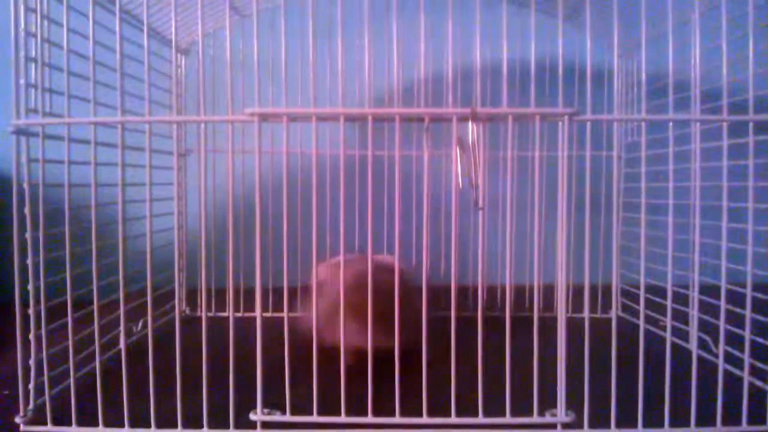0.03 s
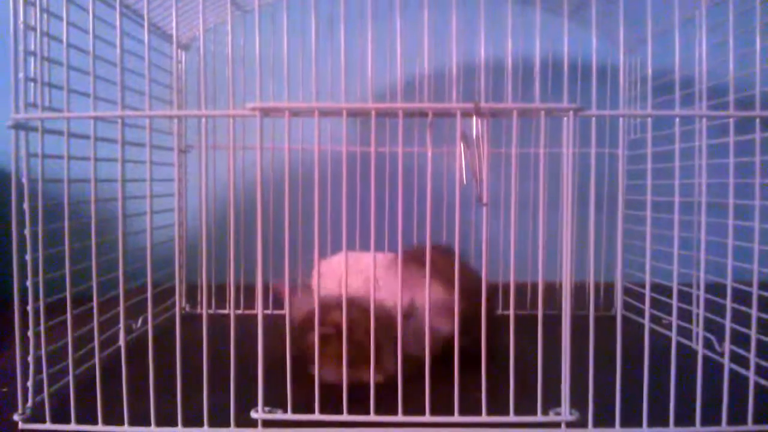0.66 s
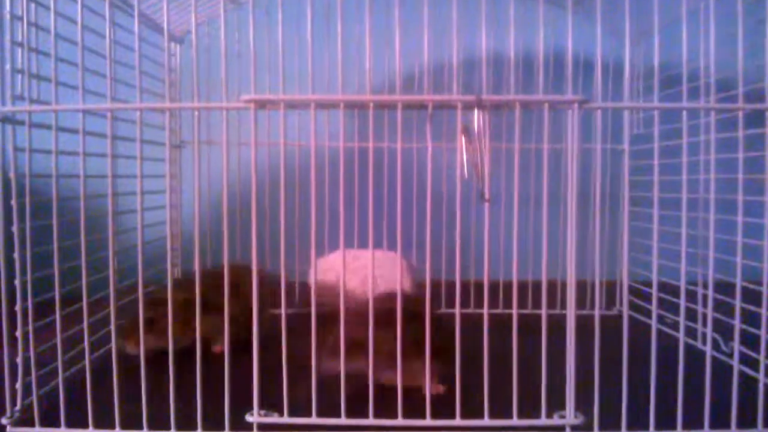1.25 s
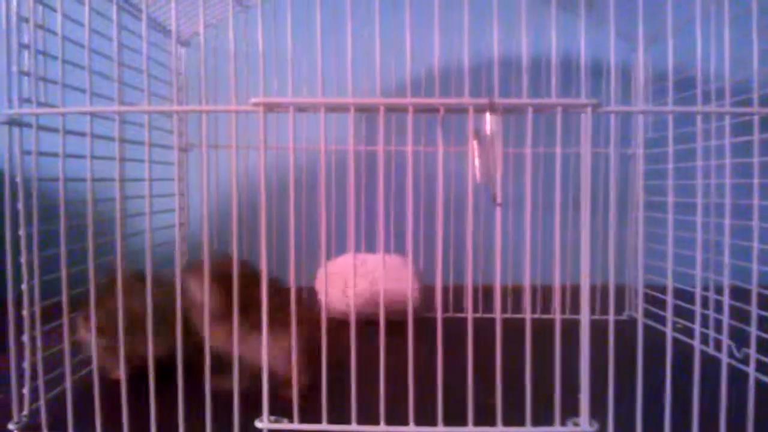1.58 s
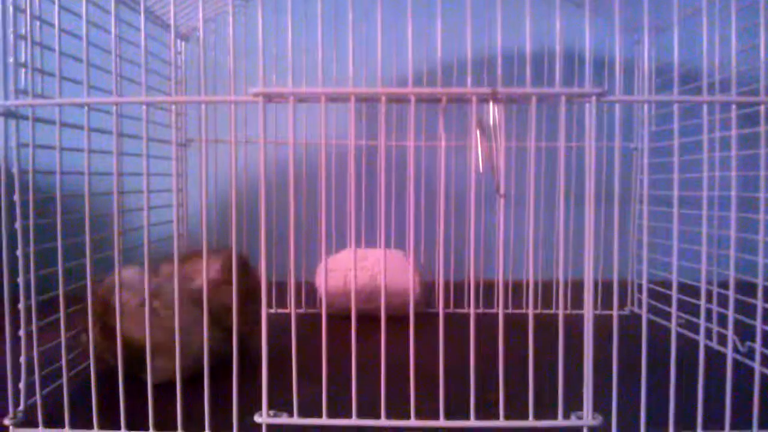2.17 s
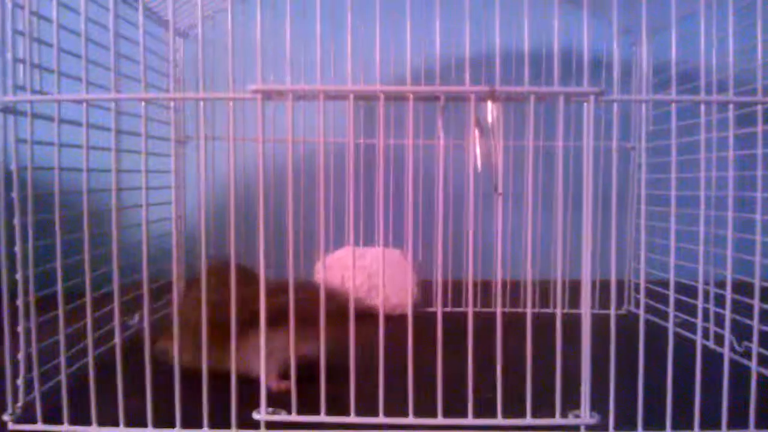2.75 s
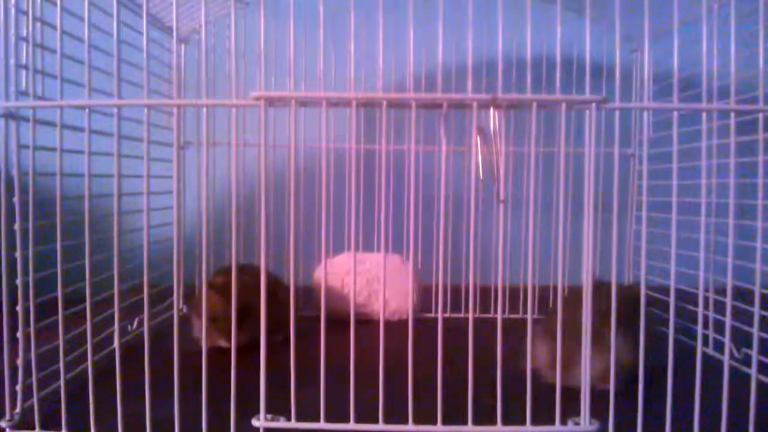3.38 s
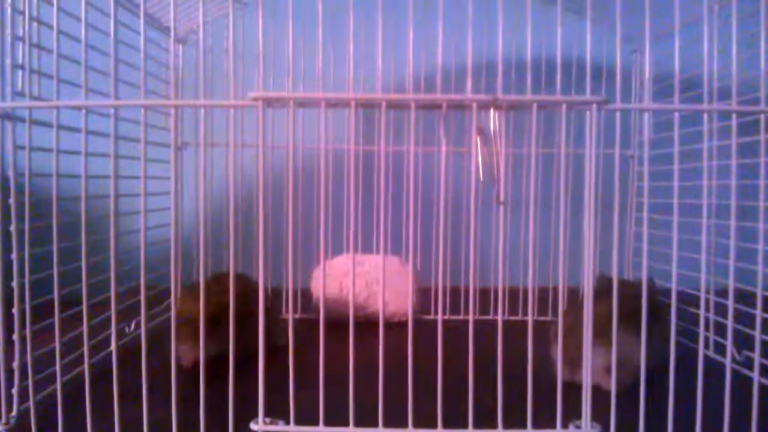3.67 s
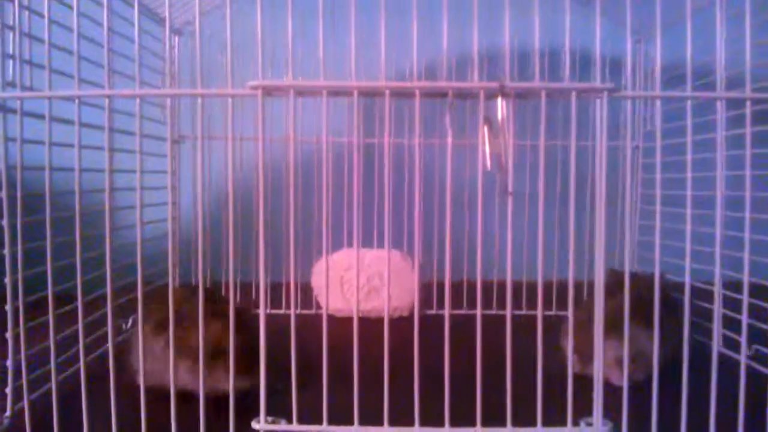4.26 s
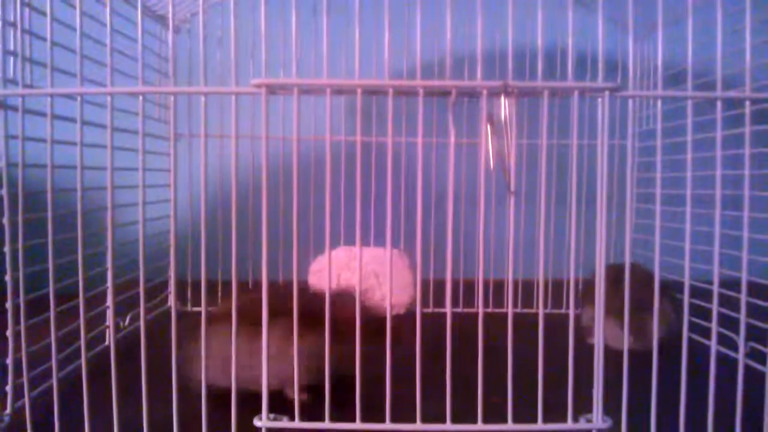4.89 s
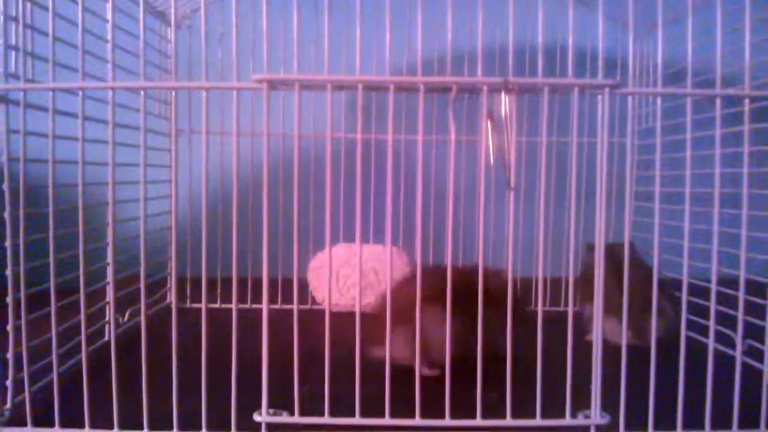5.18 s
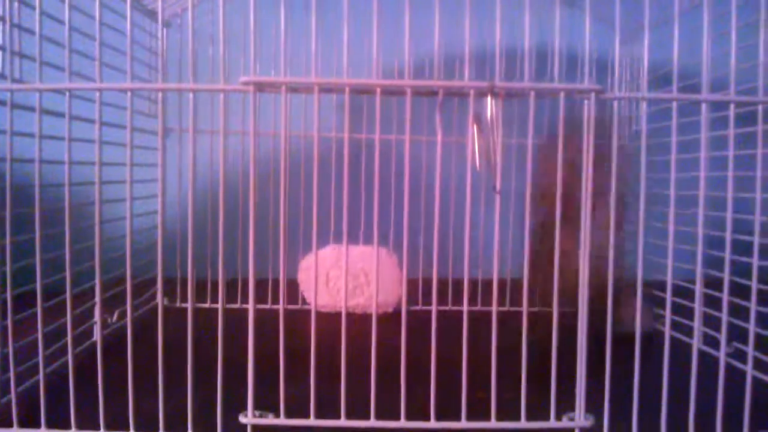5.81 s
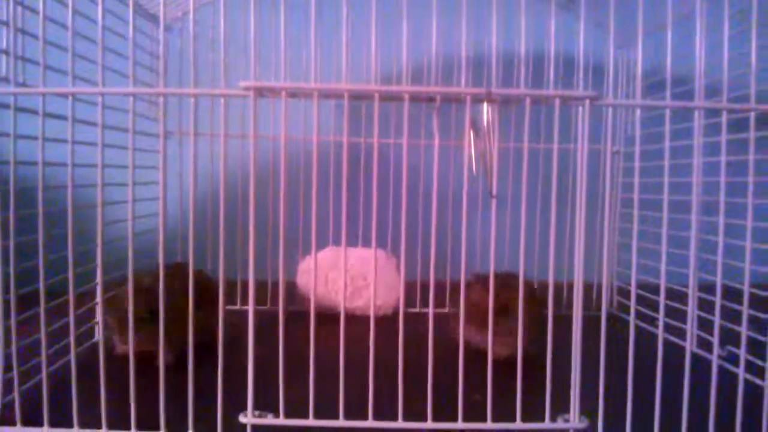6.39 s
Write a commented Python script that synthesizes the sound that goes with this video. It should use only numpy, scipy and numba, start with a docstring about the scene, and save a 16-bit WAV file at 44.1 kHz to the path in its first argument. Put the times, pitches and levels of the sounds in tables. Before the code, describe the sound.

In a quiet room, bursts of rough, wavering squeaks come from two fighting hamsters while their cage bars hum faintly. The voices pause for a few seconds, and bodies knock lightly on the hollow plastic tray as claws tick. The bars hum faintly again, and a last short flurry of squeals arrives with the loudest knocks, followed by a few light scratches.

```python
"""Two small hamsters fight in a wire cage with a plastic tray, over the low rumble of a quiet room.
They cry out at once as the bars hum. Each cry is a train of sharp pulses from the vocal folds, a rough
rasp that mostly breaks into wavering squeals; slow, dry creaks lead into some. From 3 s the voices rest,
bodies bump the tray and claws tick. At 5.5 s climbing feet set the bars humming again, and near 6 s come
a last burst of cries and the hardest bumps, then a few more ticks."""
import sys
import numpy as np
from scipy import signal
from scipy.fft import rfft, irfft
from scipy.io import wavfile
from scipy.ndimage import uniform_filter1d
from numba import njit

SR = 44100
rng = np.random.default_rng(int(sys.argv[2]) if len(sys.argv) > 2 else 0)


def generate_wav(signal):
    """Clip the signal to [-1, 1] and save it as 16-bit WAV at the path in sys.argv[1]."""
    frames = np.transpose(np.atleast_2d(signal))
    scaled = np.clip(frames, -1, 1) * 32767
    pcm = np.round(scaled).astype(np.int16)
    wavfile.write(sys.argv[1], SR, pcm)


N = 288590
TIME = np.arange(N) / SR


def undb(db):
    """Decibels to gain."""
    return 10 ** (np.asarray(db) / 20)


def unit(x):
    """Scale to rms 1."""
    return x / np.sqrt(np.mean(x ** 2))


def curves(table):
    """Each column of a table joined by straight lines in time."""
    times, *columns = np.transpose(table)
    return [np.interp(TIME, np.sort(times), column) for column in columns]


def fade(t, t60):
    """Exponential ring-down, 60 dB in t60 seconds."""
    return np.exp(-np.log(1000) * t / t60)


def add(out, start_s, x):
    """Mix x into out at start_s."""
    i = int(start_s * SR)
    out[i:i + len(x)] += x[:N - i]


def colour(x, points):
    """EQ x with a curve of (f/Hz, level/dB) points; rms 1."""
    hz, db = np.transpose(points)
    f = np.arange(len(x) // 2 + 1) * SR / len(x)
    gain = undb(np.interp(np.log(f + 1), np.log(hz), db))
    return unit(irfft(rfft(x) * gain, len(x)))


@njit
def svf(x, hz, width_hz):
    """State-variable band-pass whose centre can move every sample."""
    y, band_state, low_state = np.empty(len(x)), 0., 0.
    for i in range(len(x)):
        g = np.tan(np.pi * hz[i] / SR)
        damping = np.pi * width_hz / SR * (1 + g * g) / g
        band = (band_state + g * (x[i] - low_state)) / (1 + g * (g + damping))
        band_state = 2 * band - band_state
        low_state += 2 * g * band
        y[i] = damping * band
    return y


def resonance(x, hz, width_hz):
    """A resonance that keeps the power of a white input."""
    return svf(x + 1e-18, hz + np.zeros(len(x)), float(width_hz)) * np.sqrt(SR / np.pi / width_hz)


def steep_resonance(x, hz, width_hz):
    """A resonance applied twice: a round top and dark skirts."""
    return np.sqrt(2) * svf(resonance(x, hz, width_hz), hz + np.zeros(len(x)), float(width_hz))


def reflections(x, db, t60, delay_s):
    """A dense, decaying cloud of echoes after a pre-delay."""
    t = TIME[:SR]
    response = rng.standard_normal(len(t)) * fade(t, t60) * (t > delay_s)
    return undb(db) * signal.fftconvolve(x, response / np.linalg.norm(response))[:N]


# EQ of the room tone: f/Hz, relative level/dB
ROOM_EQ = [(15, -6), (35, 9.5), (110, -10.5), (1500, -24), (16000, -35)]


def room_tone(room_db=-58, whine_hz=13000, whine_db=-75):
    """A bed of low rumble, faint hiss and a thin electronic whine."""
    whine = unit(resonance(rng.standard_normal(N), whine_hz, width_hz=230))
    return undb(room_db) * colour(rng.standard_normal(N), ROOM_EQ) + undb(whine_db) * whine


# modes of the bars: f/Hz, relative level/dB
BAR_MODES = [(178, -11), (215, 0.5), (272, -9), (711, -5.5)]
# how hard the feet shake the bars: t/s, relative level/dB
BAR_SHAKE = [(.15, -57.5), (.9, -85.5), (5.4, -113), (5.55, -63), (5.95, -53.5), (6.3, -63.5)]


def bar_hum(trim_db=-18.5):
    """Scrabbling feet keep the narrow modes of the wire cage humming."""
    shake_db, = curves(BAR_SHAKE)
    feet = rng.standard_normal(N) * undb(shake_db)
    hum = sum(undb(db) * resonance(resonance(feet, hz, 163), hz, 73) for hz, db in BAR_MODES)
    return undb(trim_db) * hum


# claws on tray and bars: t/s, level/dB
CLAW_TICKS = [(1.559, -51), (3.7047, -43.5), (3.786, -50.5), (3.8843, -55), (5.517, -40.5), (5.5598, -39.5),
              (6.397, -49), (6.429, -39.5), (6.511, -50.5)]


def claw_ticks(t60=.0067):
    """Each claw strike is a tiny, dry burst of bright noise."""
    out, t = np.zeros(N), TIME[:SR // 20]
    for start, db in CLAW_TICKS:
        burst = rng.standard_normal(len(t)) * fade(t, t60)
        add(out, start, undb(db) * resonance(burst, hz=9050, width_hz=4500))
    return out


# EQ of the tray's dense knock: f/Hz, relative level/dB
KNOCK_EQ = [(90, -21), (340, -8), (520, -5.5), (820, 0), (1400, -8.5), (2200, -10.5), (4500, -23),
            (15000, -36.5)]
# modes of the tray's hollow ring: f/Hz, relative level/dB
RING_MODES = [(318, -0.5), (374, 0), (503, -3), (598, -2), (652, 1.5), (725, -1), (770, -1.5), (860, -3.5),
              (1060, -12)]
# bodies and feet on the tray: t/s, level/dB, scuffle length/s, tilt/(dB per octave),
# relative ring level/dB, f/Hz that rings most at that spot
TRAY_BUMPS = [(1.85, -59, 0.031, -3, -21, 700), (2.418, -56.5, 0.05, 5.5, -15, 805),
              (2.682, -39, 0.035, 2.5, -10, 860), (3.005, -64, 0.02, -4, -6, 804),
              (3.204, -60, 0.04, -3.5, -10, 836), (3.3, -57, 0.1, -3.5, -6, 820),
              (3.397, -48.5, 0.025, 3.5, -1, 750), (3.46, -54, 0.049, -2, -7, 790),
              (3.99, -62.5, 0.062, 0, -9, 725), (4.047, -47, 0.047, -0.5, -4.5, 722),
              (4.437, -53.5, 0.036, -4, -6, 690), (4.575, -46.5, 0.027, -2, -2.5, 644),
              (4.595, -37, 0.037, 5, 4, 628), (6.009, -31.5, 0.073, 1.5, 0, 650),
              (6.049, -25, 0.016, 4, -9.5, 520)]


def tray_bumps(knock_t60=.36, ring_t60=.25, off_spot_db=-16, crunch_db=3, softness=4):
    """A blow and a short grainy scuffle shake the plastic tray, which rings on; soft hits are duller."""
    out, t = np.zeros(N), TIME[:SR // 2]
    for start, db, length, tilt_db, ring_db, spot_hz in TRAY_BUMPS:
        scuffle = np.exp(-(t / length) ** 2)
        grain = undb(crunch_db * unit(uniform_filter1d(rng.standard_normal(len(t)), size=100)))
        knock = colour(rng.standard_normal(len(t)), KNOCK_EQ)
        knock *= scuffle * grain + .5 * fade(t, knock_t60)
        ring = np.zeros(len(t))
        for hz, mode_db in RING_MODES:
            off_spot = min(abs(hz - spot_hz) / 110, 1)
            ring += undb(mode_db + off_spot_db * off_spot) * np.sin(2 * np.pi * (hz * t + rng.random()))
        bump = unit(knock) + 2 * undb(ring_db) * unit(ring * fade(t, ring_t60))
        bump = colour(bump, [(700, 0), (2800, 2 * tilt_db)])
        attack = (1 - np.exp(-t / (softness * length ** 2))) ** 2  # long scuffles build up slowly
        bump *= attack * (1 - t / t[-1])
        add(out, start, undb(db) * bump / np.std(bump[:SR // 25]))  # the first 40 ms set the level
    return out


# throat and mouth resonances while creaking: f/Hz, width/Hz, relative level/dB
CREAK_FORMANTS = [(2190, 920, -10.5), (5000, 5300, -9), (10570, 2200, 1.5)]
# dry creaks between cries: t/s, length/s, snap rate/Hz, level/dB, flutter length/s, top resonance/dB
VOICE_CREAKS = [(0.3343, .008, 140, -41.5, 0.0027, 5), (.356, 0.0323, 297, -44, 0.00044, -4),
                (0.395, 0.024, 620, -40.5, 0.00072, -4), (0.428, 0.074, 210, -43.5, 0.0019, -3),
                (1.192, 0.09, 200, -45.5, .004, -9), (1.644, 0.0243, 420, -38.5, 0.002, 3.5)]


def voice_creaks(top_hz=14600, flutter_hz=900, scatter=.3):
    """Slack folds snap open at uneven intervals; each snap is one dry click or a short flutter."""
    out = np.zeros(N)
    for start, length, rate, db, flutter_s, top_db in VOICE_CREAKS:
        gaps, sizes = np.exp(scatter * rng.standard_normal((2, 40)))
        snaps = (np.cumsum(gaps) - gaps[0]) / rate
        flutter = np.arange(1 + int(flutter_s * flutter_hz)) / flutter_hz
        clicks = np.zeros(SR // 8)
        for snap, size in zip(snaps[snaps < length], sizes):
            click_s = snap + flutter * np.exp(scatter * rng.standard_normal())
            clicks[(click_s * SR).astype(int)] += size
        voice = sum(undb(level) * resonance(clicks, hz, width) for hz, width, level in CREAK_FORMANTS)
        voice += undb(top_db) * resonance(clicks, top_hz, width_hz=2000)
        add(out, start, undb(db) * voice * np.sqrt(length * SR / np.sum(voice ** 2)))
    return out


# brief strains within a cry: centre t/s, length/s, target f/Hz, level over the rasp/dB, hoarseness/0-1
SQUEAL_ARCHES = [(0.059, 0.014, 1942, 4, 0.86), (0.088, 0.023, 2233, 1.5, 0.43),
                 (0.107, 0.017, 2206, 2.5, 0.31), (0.143, 0.025, 2235, 3, 0.54),
                 (0.18, 0.019, 2612, 4.5, 0.4), (0.195, 0.016, 2120, 3, 0.4),
                 (0.229, 0.016, 1990, 2.5, 0.74), (0.551, 0.017, 955, 5.5, 0.53),
                 (0.709, 0.025, 1359, 2.5, 0.53), (0.754, 0.023, 1606, 2, 0.56),
                 (0.803, 0.019, 1324, 2.5, 0.48), (0.89, 0.019, 1316, 5.5, 0.41),
                 (1.032, 0.023, 1398, 6.5, 0.72), (1.048, 0.015, 2060, 10, 0.79),
                 (1.064, 0.01, 2350, 7, 0.48), (1.737, 0.024, 1454, 5, 0.87), (1.773, 0.024, 1977, 3, 0.6),
                 (1.812, 0.062, 2385, 3, 0.3), (1.856, 0.033, 2057, 3, 0.31), (1.888, 0.034, 2415, 4, 0.29),
                 (2.195, 0.024, 1690, 1.5, 0.6), (2.22, 0.025, 1899, 2.5, 0.92),
                 (2.251, 0.038, 1742, 3, 0.84), (2.284, 0.026, 1355, 3, 0.43),
                 (2.321, 0.042, 2017, 4.5, 0.31), (2.744, 0.049, 1660, 1.5, 0.95),
                 (2.842, 0.054, 1840, 5, 0.55), (2.877, 0.012, 2102, 8.5, 0.29),
                 (5.988, 0.026, 2380, 7.5, 0.24), (6.023, 0.026, 2086, 5.5, 0.55),
                 (6.107, 0.026, 2016, 2.5, 0.46)]


def squeal_curves(edge_s=.01):
    """Squeals are arches of strain that merge; gives curves of strain, pitch, lift and hoarseness."""
    centre, length, hz, db, hoarse = np.transpose(SQUEAL_ARCHES)
    t = TIME[::32]
    hoarse = np.clip(hoarse, 0, 1)
    # short squeals are round; long or hoarse ones hold flat and break off abruptly
    squareness = length / edge_s * (1 + hoarse)
    distance = np.minimum(np.abs(2 * (t[:, None] - centre) / length), 10)
    arches = .5 ** (distance ** squareness) + 1e-18
    total = arches.sum(axis=1)
    blends = [arches @ column / total for column in (hz, db, hoarse)]
    return [np.interp(TIME, t, curve) for curve in (np.minimum(total, 1), *blends)]


def effort(live, cry, squeals):
    """Pulse rate, gain, hoarseness and air leak of a cry: a swelling rasp lifted by cracking squeals."""
    attack_s, swell_db = .014, 5
    slack_octaves, slack_db = .45, -6.5  # without effort the folds are slower and weaker
    cracks_per_s, crack_octaves, crack_db, cling = 130, .45, 1.2, .6
    start, length, release, rasp_hz, rasp_db, breath, *_ = cry
    strain, squeal_hz, squeal_db, squeal_hoarse = (curve[live] for curve in squeals)
    t = TIME[live] - start
    slack = 1 - np.clip(np.minimum(t / attack_s, (length - t) / release), 0, 1)
    rasp = rasp_hz * 2 ** (-slack_octaves * slack)
    glide = rasp + strain * (squeal_hz - rasp)
    # between two cracks the folds cling to one pitch and force, and may turn hoarse
    stretch = np.cumsum(rng.random(len(t)) < cracks_per_s / SR)
    held = np.bincount(stretch, glide)[stretch] / np.bincount(stretch)[stretch]
    jump, force = rng.standard_normal((len(t), 2))[stretch].T
    hoarse_odds = breath + strain * (squeal_hoarse ** 2 / 2 - breath)
    hoarse = rng.random(len(t))[stretch] < hoarse_odds
    hz = (glide + cling * (held - glide)) * 2 ** (crack_octaves * breath * jump)
    swell = np.sin(np.pi * t / length) - 2 / np.pi
    db = rasp_db + slack_db * slack + swell_db * swell + strain * squeal_db + crack_db * force
    fade_out = np.sqrt(np.clip(2 * (length - t) / release, 0, 1))
    leak = 1 - strain / 2  # taut folds leak less air
    return hz, undb(db) * fade_out, hoarse, leak


def fold_pulses(cry, squeals):
    """Uneven closures of the vocal folds, each with a puff of air: the drive for throat and mouth."""
    wander, jitter, shimmer_db, hoarse_scatter = .6, .3, 10, .055
    open_share, turbulence, throat_air = .63, 1.7, .42
    start, length, _, rasp_hz, _, breath, *_ = cry
    live = np.flatnonzero((TIME >= start) & (TIME <= start + length))
    hz, gain, hoarse, leak = effort(live, cry, squeals)
    # slack, slow folds rasp; taut, fast ones squeal cleanly until they break
    rough = .003 + .12 / (1 + (hz / 820) ** 3) + hoarse_scatter * hoarse
    quiver = .018 * unit(resonance(rng.standard_normal(len(live)), hz=60, width_hz=70))
    phase = np.cumsum(hz * (1 + quiver)) / SR
    cycles = np.arange(int(phase[-1]) + 2)
    drift, slip, force = rng.standard_normal((len(cycles), 3)).T
    uneven = np.interp(cycles, phase, rough)
    closure_phase = cycles + .5 + np.cumsum(wander * uneven * drift) + jitter * uneven * slip
    closures = np.interp(closure_phase, phase, live)
    # the force swells and sags over a few cycles; strong and weak closures alternate now and then
    surge_db = uniform_filter1d(force, size=9) * (2 + 3 * (-1) ** cycles)
    push = undb(shimmer_db * uneven * force + surge_db)
    size = np.sqrt(SR / np.interp(closures, live, hz)) * push * (closure_phase < phase[-1])
    # windowed sincs place the closures between samples
    taps = closures.astype(int)[:, None] + np.arange(-7, 9)
    lag = taps - closures[:, None]
    train, puffs = np.zeros((2, N))
    np.add.at(train, np.abs(taps), size[:, None] * np.sinc(lag) * np.cos(np.pi * lag / 16) ** 2)
    since_closure = np.interp(live, np.sort(closures), cycles) % 1
    puffs[live] = unit(np.exp(-since_closure / open_share)) * rng.standard_normal(len(live))
    # rough and breathy stretches turn to turbulence, more in the mouth than in the throat
    air = np.interp(TIME, TIME[live], turbulence * leak * (6 * rough + breath * rasp_hz / hz))
    at_throat = train + throat_air * air * puffs
    at_mouth = (train + air * puffs) / np.hypot(1, air)
    return np.array([at_throat, at_mouth]) * np.interp(TIME, TIME[live], gain)


def mouth_shape(cries, wobble=.035, wobble_hz=10):
    """The mouth holds a shape through the middle half of a cry, then glides on; its resonance wobbles."""
    holds = [(start + length * share, *rest[-3:])
             for start, length, *rest in cries for share in (.25, .75)]
    mouth_hz, upper_db, throat_db = curves(holds)
    jaw = wobble * unit(resonance(rng.standard_normal(N), wobble_hz, 2 * wobble_hz))
    return mouth_hz * (1 + jaw), upper_db, throat_db


# the cries: t/s, length/s, release/s, rasp f/Hz, relative level/dB, breathiness/0-1,
# mouth resonance f/Hz, upper resonance level/dB, throat level/dB
HAMSTER_CRIES = [(0, 0.25, 0.059, 1001, -35.5, 0.22, 7080, 1.5, -4),
                 (0.509, 0.093, 0.024, 424.5, -44.5, 0.01, 7450, -2.5, -6),
                 (0.59, 0.36, 0.053, 998.4, -33, 0.12, 7000, 7.5, -6),
                 (0.955, 0.13, 0.022, 824, -37, 0.23, 9770, -3, -12.5),
                 (1.223, 0.12, 0.058, 654, -50.5, 0.1, 7550, -16, -7.5),
                 (1.692, 0.27, 0.029, 800, -38.5, 0.02, 8710, -9, -6),
                 (1.914, 0.35, 0.015, 821.3, -48, 0.14, 8160, -10.5, -1.5),
                 (2.166, 0.2, 0.053, 871, -43.5, 0.04, 7670, -2.5, -3),
                 (2.486, 0.11, 0.037, 848, -42.5, 0.15, 9100, -22, -9.5),
                 (2.646, 0.14, 0.039, 802, -34, 0.01, 10300, -14, -13),
                 (2.731, 0.16, 0.018, 1122, -41.5, 0.14, 7600, -2.5, -3),
                 (5.819, 0.09, 0.03, 1080, -35, 0.41, 8600, -11, -14),
                 (5.889, 0.23, 0.025, 1108, -38.5, 0.15, 8940, 3, -2.5),
                 (6.053, 0.13, 0.0087, 1049, -34.5, 0.19, 8000, 4, -2.5),
                 (6.176, 0.063, 0.062, 825, -42.5, 0.04, 7100, -0.5, -2)]


def hamster_cries(trim_db=-1.06, low_cut_hz=680):
    """The pulses ring two throat resonances, two moving ones of the tiny mouth and a shrill top one."""
    mouth_hz, upper_db, throat_db = mouth_shape(HAMSTER_CRIES)
    upper_hz = 9340 + .44 * mouth_hz
    top_db = -2 + .3 * upper_db
    squeals = squeal_curves()
    at_throat, at_mouth = sum(fold_pulses(cry, squeals) for cry in HAMSTER_CRIES)
    throat = resonance(at_throat, 2162, 1130) + undb(2) * resonance(at_throat, 5080, 3600)
    mouth = steep_resonance(at_mouth, mouth_hz, 4100)
    upper = resonance(at_mouth, upper_hz, 1260)
    top = steep_resonance(at_mouth, 15000, 2600)
    voice = undb(throat_db) * throat + mouth - undb(upper_db) * upper + undb(top_db) * top
    voice = signal.sosfilt(signal.butter(2, low_cut_hz, "high", fs=SR, output="sos"), voice)
    return undb(trim_db) * voice / np.sqrt(1 + undb(upper_db) ** 2 + undb(top_db) ** 2)


def scene():
    """The fight, reflected by tray walls and room, over bar hum and room tone; mono."""
    fight = hamster_cries() + voice_creaks() + tray_bumps() + claw_ticks()
    tray_walls = reflections(fight, db=-9, t60=.03, delay_s=.0005)
    room = reflections(fight, db=-14, t60=.38, delay_s=.006)
    return (fight + tray_walls + room + bar_hum() + room_tone())[None]


def record(dry, high_cut_hz=15900):
    """A steep low-pass takes off the very top."""
    return signal.sosfilt(signal.ellip(10, .2, 70, high_cut_hz, fs=SR, output="sos"), dry)


dry = scene()
out = record(dry)
generate_wav(out)
```